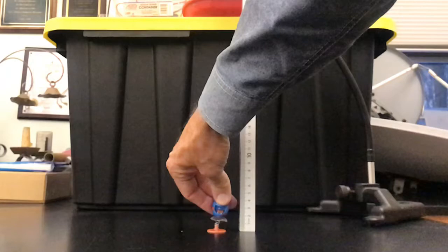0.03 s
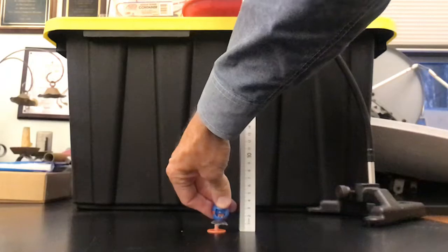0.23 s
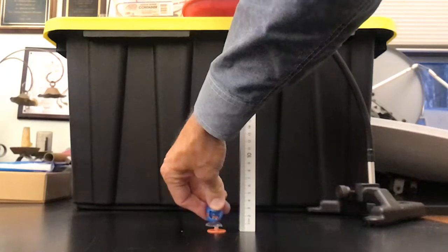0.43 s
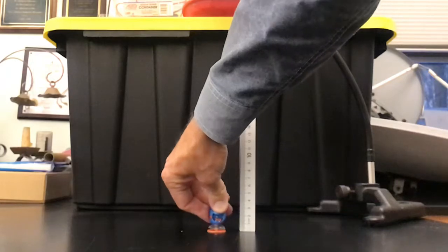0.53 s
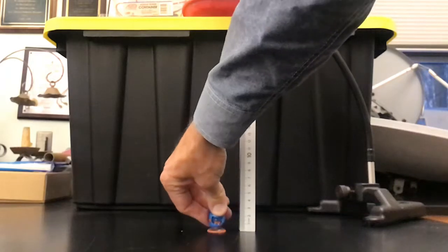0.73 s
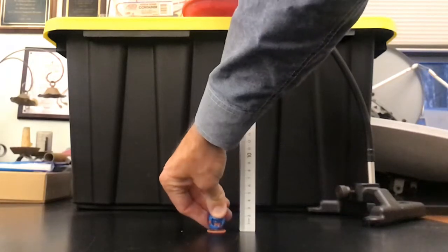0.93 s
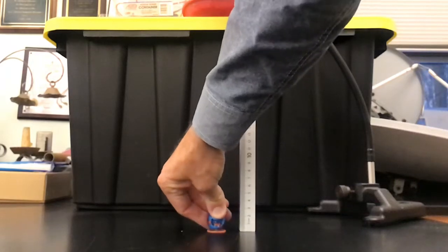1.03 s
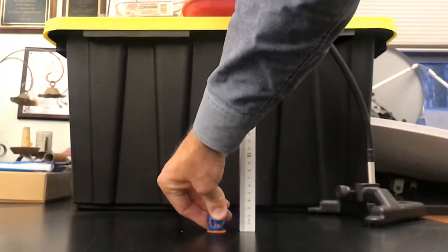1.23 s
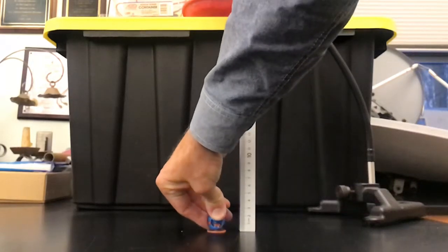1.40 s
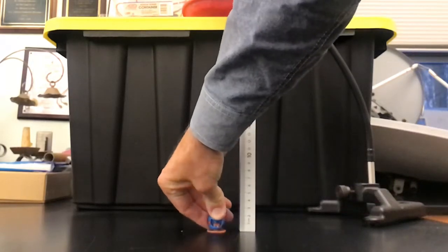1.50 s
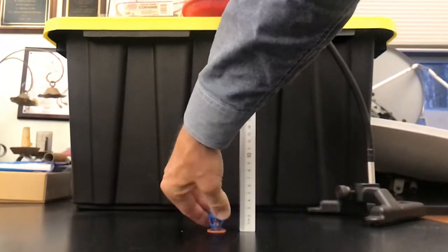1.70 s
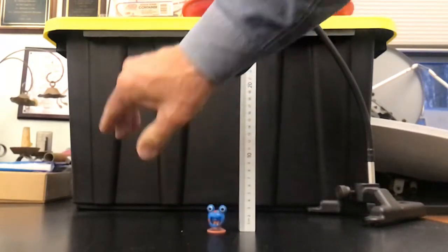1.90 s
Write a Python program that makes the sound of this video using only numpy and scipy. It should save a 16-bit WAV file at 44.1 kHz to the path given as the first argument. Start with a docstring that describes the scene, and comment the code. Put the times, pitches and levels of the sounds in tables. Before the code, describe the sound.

Sharp close clicks come from a pop-up toy being pushed down on a tabletop. It snaps, clacks against its base, and its suction cup gives a few uneven ticks, over faint room hum and hiss.

```python
"""On a table in a quiet room, a small spring pop-up toy is pressed down.
Its plastic body snaps as the spring slides in, and the suction cup meets the base with a double clack
and a thud. The cup then ticks as it is squeezed flat and sets the table ringing. Each contact is an
impulse that excites damped modes, and the room reflects it. The background rumble and hiss are turned
down quickly near the end, as by a noise suppressor."""
import sys
import numpy as np
from scipy import signal
from scipy.io import wavfile

SR = 44100
rng = np.random.default_rng(int(sys.argv[2]) if len(sys.argv) > 2 else 0)


def put_to_file(sound):
    """Save the sound as 16-bit audio at rate SR, in the file named by the first command-line argument."""
    columns = np.atleast_2d(sound).T  # one column per channel
    safe = np.clip(columns, -1, 1)
    whole_steps = np.round(safe * 32767)
    wavfile.write(sys.argv[1], SR, whole_steps.astype(np.int16))


N = 85995
TIME = np.arange(N) / SR

# The body snaps on the spring. Each row: start in seconds, level in dB.
SNAPS = [(0.4957, 1)]
# The cup lands on the base. Each row: start in seconds, clack level in dB, thud level in dB.
LANDINGS = [(0.6618, -3, 4), (0.6664, 1, -6)]
# The cup slips. Each row: start in seconds, then levels in dB of tick, table ring and treble edge.
TICKS = [(0.8986, -3, -2.5, -37.5), (1.035, 0.5, -0.5, -51), (1.1554, 0, -1, -36), (1.2009, -4, -8, -27.5),
         (1.2126, -4, -1.5, -30), (1.323, -4, -4, -26), (1.3479, -7, -1, -23.5), (1.3482, -3, -15, -22),
         (1.528, -23, -17.5, -42)]
# Skin scuffs the plastic. Each row: start in seconds, level in dB, decay time constant in seconds.
BRUSHES = [(.428, -66, .005), (.805, -75, 0.0028), (1.683, -56.5, 0.0032), (1.702, -62, 0.0013)]

# Modes of each part. Each row: frequency in Hz, level in dB, time to decay by 60 dB in seconds.
BODY_MODES = [(1397, -50.5, 0.09), (1763, -56, 0.085), (2452, -49, 0.045), (2684, -37, 0.023),
              (3050, -29, 0.018), (3480, -36, 0.03), (4642, -31.5, 0.019), (8640, -29.5, 0.015),
              (9570, -29, 0.016), (12050, -28.5, .003), (14000, -27.5, 0.004)]
BASE_MODES = [(2627, -37, 0.011), (3190, -33, 0.017), (3480, -35.5, 0.016), (4120, -32, 0.0059),
              (6850, -41, 0.0068), (8020, -42.5, 0.015), (12600, -30.5, 0.0048), (13300, -43, 0.0051)]
CUP_MODES = [(640, -37, 0.0063), (2520, -52, 0.0091), (3427, -36.5, 0.011), (3900, -42.5, 0.0078),
             (5654, -46.5, 0.018), (5663, -39.5, 0.011)]
THUD_MODES = [(194, -43.5, 0.1), (269, -46.5, 0.11), (585, -39.5, 0.041), (650, -40, 0.041),
              (844, -54, 0.079)]
TABLE_MODES = [(313, -45.5, 0.043), (385.2, -57.5, 0.23), (593, -55.5, 0.059), (681.4, -56, 0.15),
               (762.6, -57, 0.097), (889.5, -47.5, 0.092), (950.5, -49.5, 0.096), (1280, -55.5, 0.11),
               (1370, -52, 0.086), (1568, -79, 0.025), (1766, -57, 0.062), (1976, -65, 0.19),
               (1993, -57, 0.087)]
# Dense ringing of the parts, then the room's early and late reflections.
# Each row: frequency in Hz, level in dB, time to decay by 60 dB in seconds.
BODY_DENSE = [(850, -17, 0.11), (1150, -17.5, 0.049), (1550, -7, 0.036), (2100, -11, .035),
              (3030, -6.5, 0.037), (4000, -12, .02), (5560, -7.5, 0.013), (6600, -15.5, 0.01),
              (8700, -6, .014), (11000, -9.5, 0.017), (14200, -4, 0.007), (16060, -15.5, .008)]
BASE_DENSE = [(1300, -26, 0.036), (2180, -24, 0.011), (3400, -28, .016), (5250, -18, 0.021),
              (7800, -14, 0.031), (10100, -26, 0.016), (13000, -15.5, 0.038), (16400, -21, 0.011)]
CUP_DENSE = [(2520, -38, 0.045), (3540, -25.5, 0.03), (5140, -19, 0.017), (6540, -19.5, 0.016),
             (7200, -25, 0.02), (8800, -28, .016), (11100, -43.5, 0.02), (14050, -33, 0.023)]
TABLE_DENSE = [(393, -16, 0.067), (634, -10.5, 0.14), (830, -7, 0.078), (1140, -21, 0.1), (1487, -7.5, .08),
               (1780, -13, 0.088), (2340, -26.5, 0.14)]
ROOM_EARLY = [(197.8, -11.5, 0.19), (820, -13, 0.3), (1680, -9, 0.13), (3240, -13.5, 0.059),
              (5990, -14, 0.17), (9890, -18.5, 0.3), (16000, -13.5, 0.074)]
ROOM_LATE = [(199, -16, 0.17), (800, -22, 0.51), (1720, -14.5, .45), (3200, -19.5, .55), (6000, -21.5, .5),
             (10000, -27.5, 0.68), (16120, -29, .3)]

# Spectra of the background noise. Each row: frequency in Hz, relative spectral density in dB.
RUMBLE_SPECTRUM = [(28, -20), (45, -11), (80, -1.5), (135, -1.5), (165, -3.5), (200, -2.5), (250, -6.5),
                   (310, -14), (400, -15), (500, -28.5), (640, -20), (800, -32.5), (1100, -44.5)]
HISS_SPECTRUM = [(600, -6.5), (900, 9.5), (1400, 2), (2100, -1), (3100, 2), (4500, -2), (6500, -3.5),
                 (9500, -9), (13000, -11.5), (16000, -7.5)]
# Background gains, turned down near the end as by a noise suppressor.
# Each row: time in seconds, rumble gain in dB, hiss gain in dB.
NOISE_LEVELS = [(.07, 1.5, 2), (.25, -0.5, -0.5), (.55, 1, -0.5), (.72, 2, -1), (1.05, -2, -0.5),
                (1.4, 1, -1.5), (1.69, 0.5, 0.5), (1.78, -16.5, -12), (1.95, -26.5, -17.5)]
# A thin, high hiss at the start. Each row: time in seconds, level in dB.
HIGH_HISS_LEVELS = [(.07, -71.5), (.16, -70.5), (.25, -90), (.4, -130)]


def body_snap():
    """Impulse excitation: one snap on the spring sets the plastic body in free, damped vibration."""
    hit = impulses(*np.transpose(SNAPS))
    return modal_ring(hit, BODY_MODES) + dense_ring(hit, BODY_DENSE)


def snap_spill():
    """Radiation from all sides of the body sends a broader band of the snap into the room."""
    hit = impulses(*np.transpose(SNAPS))
    return from_db(-6) * butter(hit, hz=[1300, 11000], kind="band")


def cup_landing():
    """Two impacts excite the base's high modes as clacks and the table's low modes as a thud."""
    starts, clack_db, thud_db = np.transpose(LANDINGS)
    contacts, push = impulses(starts, clack_db), impulses(starts, thud_db)
    clacks = modal_ring(contacts, BASE_MODES) + dense_ring(contacts, BASE_DENSE)
    return clacks + modal_ring(push, THUD_MODES) + from_db(-5) * table_top(push)


def cup_ticks():
    """Stick-slip: each slip of the cup is a short pulse with a brief hollow ring; the table rings on."""
    starts, tick_db, table_db, edge_db = np.transpose(TICKS)
    slips = impulses(starts, tick_db)
    pulse = from_db(-14.5) * butter(slips, hz=2345, kind="high")
    tick = butter(pulse + modal_ring(slips, CUP_MODES), hz=6290, kind="low", order=12)
    edge = butter(impulses(starts, edge_db), hz=12700, kind="high", order=3)
    return tick + edge + dense_ring(slips, CUP_DENSE) + table_top(impulses(starts, table_db))


def table_top(push):
    """Like a soundboard, the table takes up each push and radiates it through its own modes."""
    return modal_ring(push, TABLE_MODES) + dense_ring(push, TABLE_DENSE)


def finger_brushes():
    """Friction noise: faint scuffs of skin on plastic, and a dull rub as the hand eases off."""
    scuff_level = sum(from_db(db) * (TIME > start) * np.exp(-np.abs(TIME - start) / decay_s)
                      for start, db, decay_s in BRUSHES)
    rub_peak_s, rub_width_s = 1.67, 0.03
    rub_level = from_db(-66) * np.exp(-.5 * ((TIME - rub_peak_s) / rub_width_s) ** 2)
    return scuff_level * noise_between(3900, 6000) + rub_level * noise_between(440, 1040)


def room(x):
    """Reverberation: reflections from nearby things die fast, and a faint diffuse tail follows."""
    return dense_ring(x, ROOM_EARLY, gap_s=.003) + dense_ring(x, ROOM_LATE, gap_s=0.015)


def background_noise():
    """Filtered noise: rumble, a wavering hum and hiss follow gain curves over a steady deep drone."""
    rumble_gain, hiss_gain = gains_in_time(NOISE_LEVELS)
    hum = from_db(-57.5) * noise_between(131, 143)
    rumble = rumble_gain * (from_db(-55) * coloured_noise(RUMBLE_SPECTRUM) + hum)
    drone = from_db(-71) * noise_between(68.4, 112)
    hiss = hiss_gain * from_db(-71) * coloured_noise(HISS_SPECTRUM)
    high_hiss = gains_in_time(HIGH_HISS_LEVELS)[0] * noise_between(11000, 15500)
    fade_in = np.clip((TIME - .07) / 0.0044, 0, 1)
    return (rumble + drone + hiss + high_hiss) * fade_in


def impulses(times, db):
    """A contact much shorter than the ringing it excites acts as a single impulse."""
    out = np.zeros(N)
    np.add.at(out, np.clip(np.round(times * SR).astype(int), 0, N - 1), from_db(db))
    return out


def modal_ring(x, modes):
    """Modal superposition: each mode answers an impulse with a damped sine, alternating in sign."""
    out = np.zeros(N)
    for k, (hz, db, t60) in enumerate(modes):
        radius, angle = from_db(-60 / (t60 * SR)), 2 * np.pi * hz / SR
        feedback = [1, -2 * radius * np.cos(angle), radius * radius]
        out += (-1) ** k * from_db(db) * signal.lfilter([0, np.sin(angle)], feedback, x + 1e-18)
    return out


def dense_ring(x, rows, gap_s=0):
    """Modal overlap: modes too dense to resolve act as noise, each band decaying at its own rate."""
    response, age = np.zeros(N), np.maximum(TIME - gap_s, 0)
    for hz, band in noise_bands(rows[0][0], rows[-1][0]):
        db, t60 = at_hz(rows, hz)
        fade = from_db(-60 * age / t60) * (TIME >= gap_s)
        settled = np.roll(band, N // 2)   # past the filter's onset transient
        response += from_db(db) * settled * fade / np.sqrt(np.sum(fade ** 2))
    return signal.fftconvolve(x, response)[:N]


def coloured_noise(spectrum):
    """Weighted bands add up to steady noise of the given spectrum, at rms 1."""
    bands = noise_bands(spectrum[0][0], spectrum[-1][0])
    return rms_one(sum(from_db(at_hz(spectrum, hz)[0]) * band for hz, band in bands))


def noise_bands(low_hz, high_hz):
    """A third-octave filter bank splits white noise. Each item: centre in Hz, samples."""
    edges = 22 * 2 ** (np.arange(30) / 3)
    white = rng.standard_normal((2, N))   # neighbouring bands are uncorrelated
    return [(np.sqrt(lower * upper), butter(white[k % 2], [lower, upper], "band"))
            for k, (lower, upper) in enumerate(zip(edges, edges[1:]))
            if upper > low_hz and lower < high_hz]


def noise_between(low_hz, high_hz):
    """Band-limited noise at rms 1."""
    return rms_one(butter(rng.standard_normal(N), [low_hz, high_hz], "band"))


def at_hz(rows, hz):
    """Interpolation of a table's columns on a log-frequency axis."""
    frequencies, *columns = np.transpose(rows)
    return [np.interp(np.log(hz), np.log(frequencies), column) for column in columns]


def gains_in_time(rows):
    """Interpolation in dB gives a gain at every sample."""
    times, *columns = np.transpose(rows)
    return [from_db(np.interp(TIME, times, column)) for column in columns]


def butter(x, hz, kind, order=2):
    """A causal Butterworth filter, maximally flat in its passband."""
    sections = signal.butter(order, np.clip(hz, 10, .48 * SR), kind, fs=SR, output="sos")
    return signal.sosfilt(sections, x + 1e-18)


def rms_one(x):
    """Normalisation to unit mean power."""
    return x / np.sqrt(np.mean(x ** 2) + 1e-20)


def from_db(db):
    """Amplitude grows tenfold with every 20 dB."""
    return 10 ** (np.asarray(db) / 20)


def scene():
    """Superposition of the toy's direct sound, its reflections and the background noise."""
    knocks = body_snap() + cup_landing() + finger_brushes()
    ticks = cup_ticks()
    into_room = from_db(-3.5) * knocks + from_db(-4) * ticks   # ticks, near the table, spread less
    reflections = room(into_room) + room(snap_spill())
    return (knocks + ticks + reflections + background_noise())[None]


def record(dry):
    """Band limiting: an elliptic low-pass filter cuts the highest treble steeply."""
    cutoff_hz = 15800
    return signal.sosfilt(signal.ellip(10, .2, 80, cutoff_hz, fs=SR, output="sos"), dry)


dry = scene()
out = record(dry)
put_to_file(out)
```